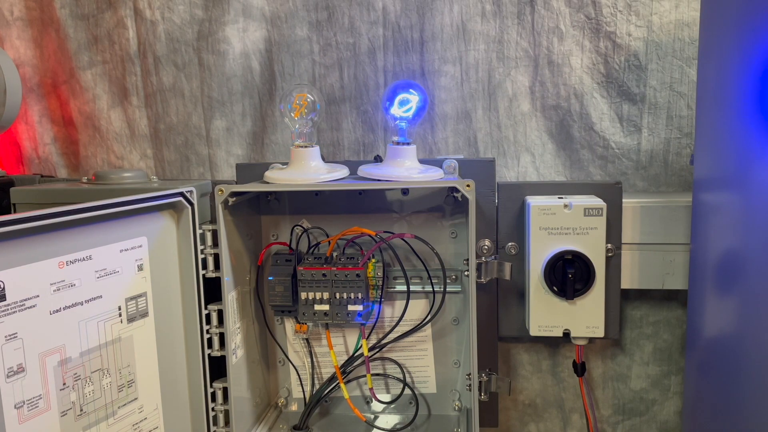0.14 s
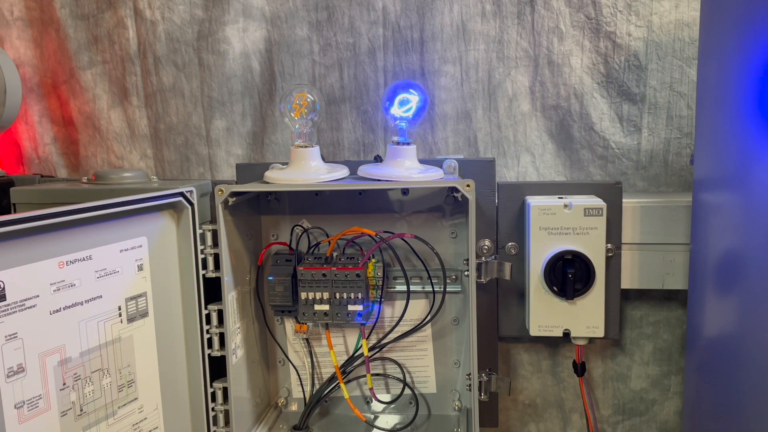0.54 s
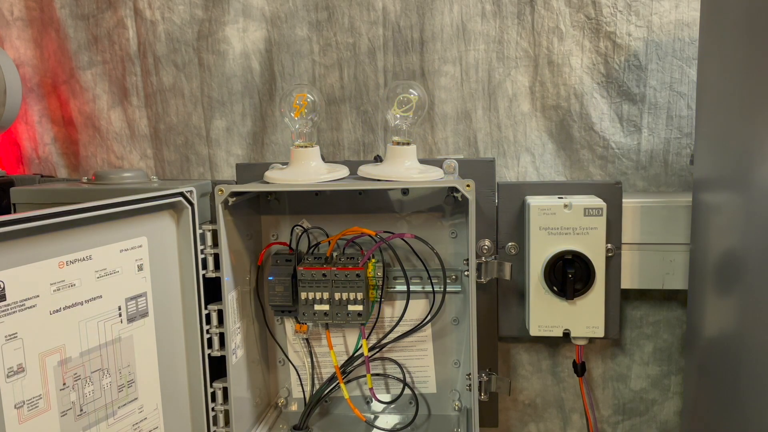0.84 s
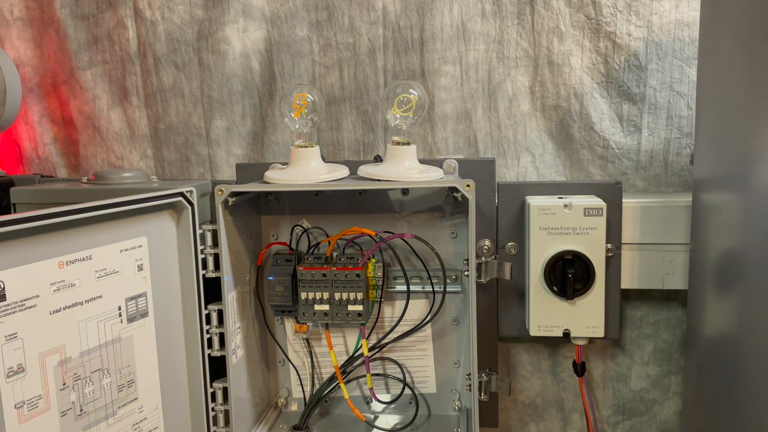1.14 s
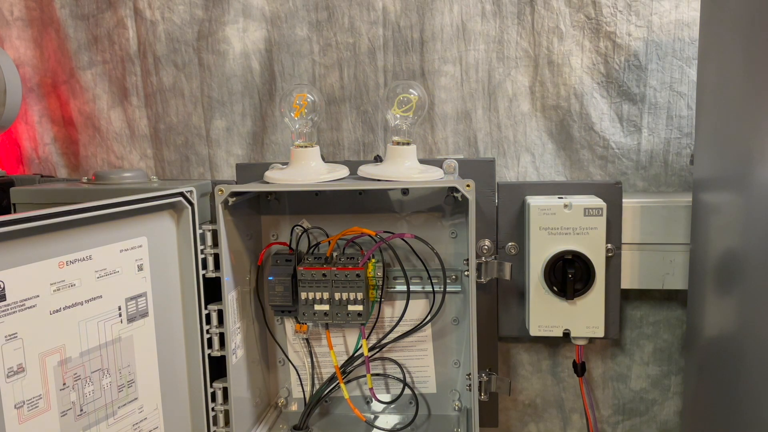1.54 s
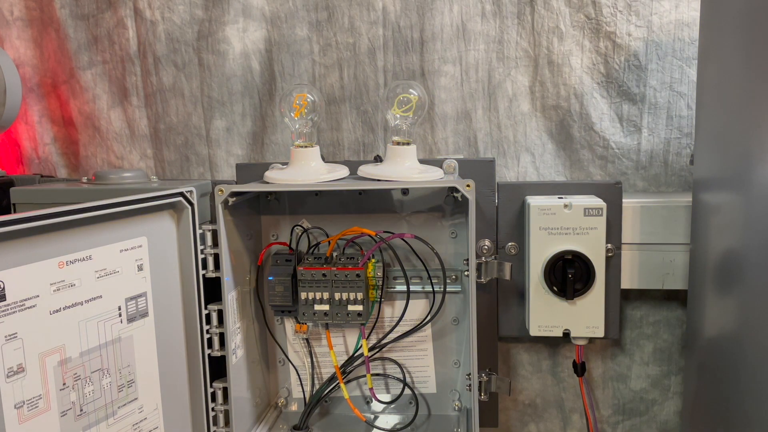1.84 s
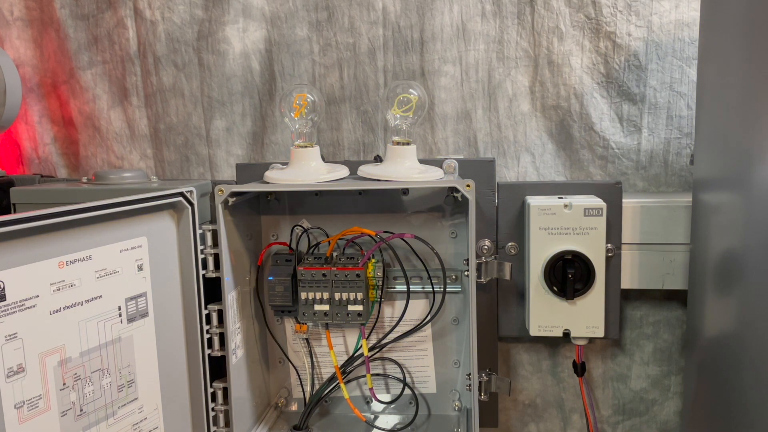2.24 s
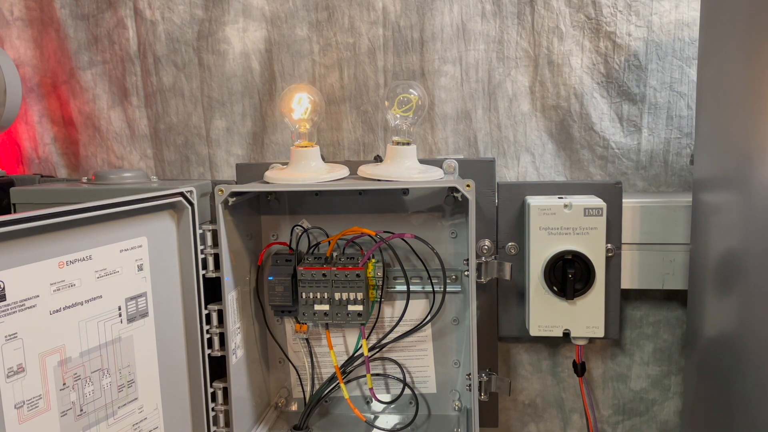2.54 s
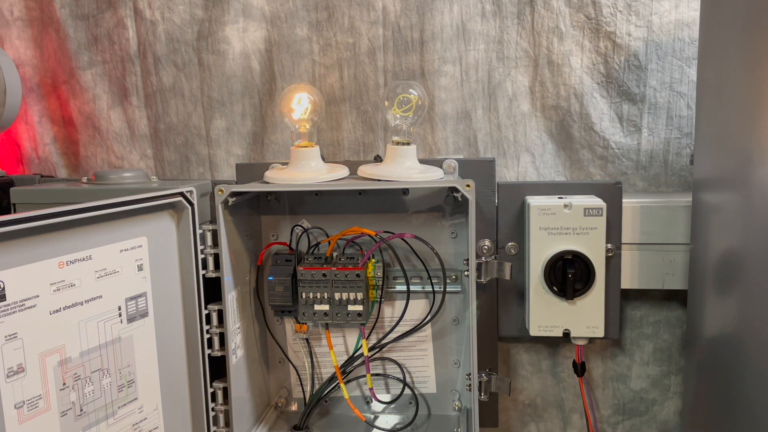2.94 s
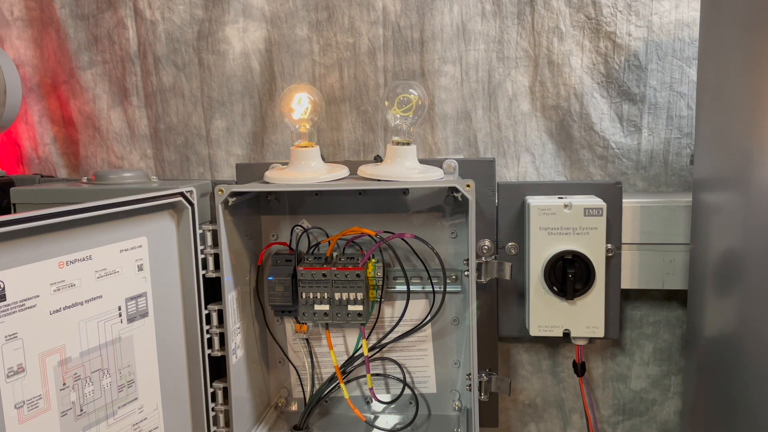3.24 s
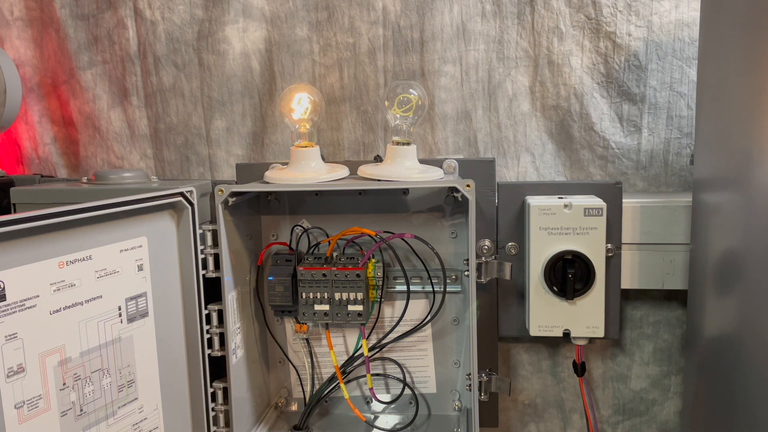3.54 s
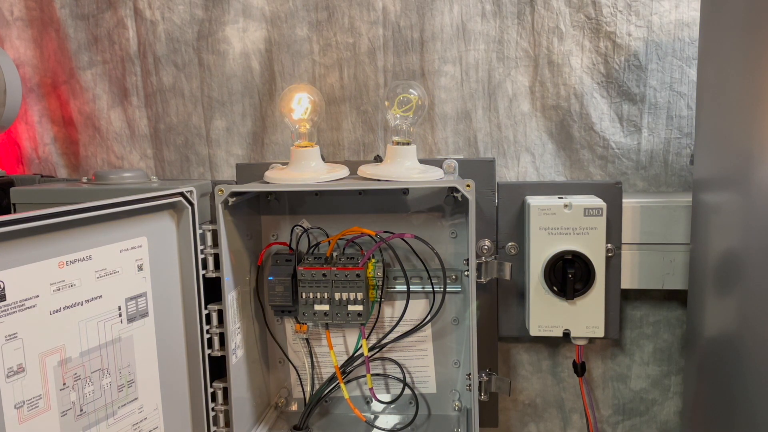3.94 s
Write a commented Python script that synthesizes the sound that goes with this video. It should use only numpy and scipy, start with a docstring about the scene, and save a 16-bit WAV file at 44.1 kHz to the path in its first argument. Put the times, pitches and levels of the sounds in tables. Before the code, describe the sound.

Indoors, a faint low mains hum and soft room rumble run throughout. Early on, a switching relay snaps open: several tiny blows fused into one hard clack with a boxy thump and short after-ring. Later come faint handling ticks and rustle, a muted knock, and a light touch running straight into another relay's brighter, metallic clack. Only the quiet background follows. Single nearby microphone, modest room reverberation.

```python
"""Mains hum, room rumble and hiss run throughout: a wavering sine and noise of set spectrum.
At 0.72 s one contactor in an open control box drops out: blows ring its housing, springs and the box.
From 1.76 s come faint ticks and rustle, as noise bursts; at 2.23 s one soft knock, as dying sines.
At 2.38 s a soft touch, one short note, leads a second contactor pulling in with a clack of its own.
Ticks, rustle, knock and touch get an echo of sparse taps; each clack leaves a dense after-ring."""
import sys
import numpy as np
from scipy import signal
from scipy.io import wavfile

SR = 44100
rng = np.random.default_rng(int(sys.argv[2]) if len(sys.argv) > 2 else 0)


def pcm_store(signal):
    """Save signal as 16-bit PCM."""
    levels = np.round(np.clip(np.atleast_2d(signal), -1, 1) * 32767)
    wavfile.write(sys.argv[1], SR, levels.astype(np.int16).T)


N = 180413


def gain_of(db):
    """Amplitude factor of a level in dB."""
    return 10 ** (np.asarray(db) / 20)


def evened(x):
    """Scale to rms 1."""
    return x / np.sqrt(np.mean(x ** 2) + 1e-20)


def read(points, hz):
    """Interpolate a table over log frequency."""
    f, value = np.transpose(points)
    return np.interp(np.log(hz + 1), np.log(f + 1), value)


def add(mix, start_s, sound):
    """Mix a sound in at its start time, cut at the end of the mix."""
    part = mix[round(start_s * SR):][:len(sound)]
    part += sound[:len(part)]


def rise(length, rise_s):
    """Exponential approach from 0 to 1."""
    return 1 - np.exp(-np.arange(length) / SR / rise_s)


def bandpass(x, order, low_hz, high_hz):
    """Butterworth band-pass."""
    return signal.sosfilt(signal.butter(order, [low_hz, high_hz], "band", fs=SR, output="sos"), x)


def ring(hz, db, t60_s):
    """Sum of exponentially dying sines, half a second long."""
    t = np.arange(SR // 2)[:, None] / SR
    envelope = gain_of(db - 60 * t / np.maximum(t60_s, .002))
    return (envelope * np.sin(2 * np.pi * hz * t)).sum(1)


def drift(top_hz):
    """Slow random wander of rms 1: 16 sines from 0.3 Hz up, weaker as they get faster."""
    t = np.arange(N) / SR
    rates_hz = np.geomspace(.3, top_hz, num=16)
    return evened(sum(np.sin(2 * np.pi * (f * t + rng.random())) / np.sqrt(f) for f in rates_hz))


# decay of the reflections: f/Hz, t60/s
ROOM_DECAY = [(100, 0.77), (260, 0.71), (700, 0.31), (1840, 0.34), (3500, 0.3), (5300, 0.29), (8500, 0.23),
              (11000, 0.24), (15500, .14)]
ECHO_DB, REFLECTION_RISE_S = -8, 0.00087


def reflections(colour, db):
    """Sparse reflections of random sign, each band dying at its own speed; db sets their energy."""
    taps = np.zeros(SR // 2)
    # one tap at a random place in every 10 samples
    at = np.arange(0, len(taps) - 10, 10) + rng.integers(0, 10, (len(taps) - 1) // 10)
    taps[at] = rng.choice([-1., 1.], len(at))
    hz, t, z = signal.stft(taps, SR, nperseg=512)
    band_db = read(colour, hz)[:, None] - 60 * t / read(ROOM_DECAY, hz)[:, None]
    tail = signal.istft(z * gain_of(band_db), SR, nperseg=512)[1]
    tail *= rise(len(tail), REFLECTION_RISE_S)  # reflections take a moment to build up
    return gain_of(db) * tail / np.linalg.norm(tail)


def with_echo(dry_sound, colour):
    """Add the room's answer to a sound."""
    return dry_sound + signal.fftconvolve(dry_sound, reflections(colour, ECHO_DB))[:N]


# relative spectrum of rumble and hiss: f/Hz, level/(dB per Hz)
AIR_SPECTRUM = [(20, -18.5), (55, -18.5), (78, -7.5), (98, -14.5), (130, -8.5), (224, -10), (270, -13.5),
                (471, -10), (540, -16), (692, -11), (772, -17), (1100, -17.5), (2810, -33.5), (14000, -38),
                (14500, -55.5)]
AIR_RMS_DB, SWELL_RMS_DB, SWELL_CORNER_HZ = -70.5, 1.2, 800


def air():
    """Rumble and hiss as shaped noise; the bass swells a little, the treble less."""
    frames, hz = N // 512 + 5, np.fft.rfftfreq(2048, 1 / SR)
    a, b = rng.standard_normal((frames, 1025, 2)).T
    swell = np.interp(np.arange(frames) * 512, np.arange(N), drift(3.5))
    swell_db = SWELL_RMS_DB * swell / (1 + hz[:, None] / SWELL_CORNER_HZ)
    spectrum = (a + 1j * b) * gain_of(read(AIR_SPECTRUM, hz)[:, None] + swell_db)
    noise = signal.istft(spectrum, nperseg=2048, noverlap=1536)[1][:N]
    return gain_of(AIR_RMS_DB) * evened(noise)


HUM_HZ, HUM_WANDER_RMS_HZ = 119.3, 0.8
HUM_RMS_DB, HUM_WAVER_RMS_DB = -74, 0.74


def hum():
    """Iron cores hum at twice the mains frequency; level and pitch waver."""
    turns = np.cumsum(HUM_HZ + HUM_WANDER_RMS_HZ * drift(9.9)) / SR
    level = gain_of(HUM_RMS_DB + HUM_WAVER_RMS_DB * drift(7.9))
    return np.sqrt(2) * level * np.sin(2 * np.pi * turns)


EDGE_DB, EDGE_TOP_HZ = -23.5, 2340  # edge relative to core


def scuff(db, hz, t60_s):
    """A short burst of grit: a core band around one frequency plus a faint bright edge."""
    t = np.arange(2048) / SR
    grit = rng.standard_normal(len(t)) * gain_of(-60 * t / max(t60_s, .002)) * rise(len(t), 0.00031)
    core = bandpass(grit, 2, hz / 1.5, hz * 1.1)
    edge = bandpass(grit, 3, hz, EDGE_TOP_HZ)
    return gain_of(db) * (core / np.linalg.norm(core) + gain_of(EDGE_DB) * edge / np.linalg.norm(edge))


# faint ticks: t/s, core energy level/dB, f/Hz, t60/s
TICK_EVENTS = [(1.766, -42.5, 1010, 0.033), (1.783, -37.5, 705, 0.024), (1.7975, -32, 757, .023),
               (1.802, -37, 1600, 0.022), (1.820, -42, 720, 0.016), (1.835, -44.5, 1920, 0.016),
               (1.89, -45, 1880, 0.044), (1.897, -41, 730, 0.019), (1.917, -39.5, 774, 0.012),
               (1.924, -54, 2200, .012), (2.053, -50, 1400, .008), (2.0846, -40.5, 1270, 0.005),
               (2.0879, -42, 1310, 0.0049)]


def ticks():
    """Faint ticks nearby, one burst of grit each."""
    out = np.zeros(N)
    for start_s, db, hz, t60_s in TICK_EVENTS:
        add(out, start_s, scuff(db, hz, t60_s))
    return out


RUSTLE_START_S, RUSTLE_END_S, RUSTLE_PER_S = 1.76, 2.3, 140  # mean rate
RUSTLE_MIN_DB, RUSTLE_SPAN_DB, RUSTLE_T60_S = -62, 10, .015
RUSTLE_LOW_HZ, RUSTLE_HIGH_HZ = 590, 1870


def rustle():
    """Fainter grit at random times, levels and pitches fills the spell of ticks."""
    out = np.zeros(N)
    gaps, sizes, pitches = rng.random((100, 3)).T
    starts_s = RUSTLE_START_S + np.cumsum(2 * gaps) / RUSTLE_PER_S
    for start_s, size, pitch in zip(starts_s, sizes, pitches):
        if start_s < RUSTLE_END_S:
            hz = RUSTLE_LOW_HZ * (RUSTLE_HIGH_HZ / RUSTLE_LOW_HZ) ** pitch
            add(out, start_s, scuff(RUSTLE_MIN_DB + RUSTLE_SPAN_DB * size, hz, RUSTLE_T60_S))
    return out


# knock modes: f/Hz, level before the slow rise/dB, t60/s
KNOCK_MODES = [(90, -51, .03), (268.7, -20, 0.011), (329, -58, .12), (1098, -43.5, 0.015),
               (1800, -52.5, 0.013), (3266, -56, 0.01094), (2720, -64.5, .05)]
KNOCK_S, KNOCK_RISE_S = 2.2256, 0.011
KNOCK_CLICK_DB, KNOCK_CLICK_T60_S = -51, .005


def knock():
    """Dying modes that build up slowly, with a small noise click on top."""
    out = np.zeros(N)
    body = ring(*np.transpose(KNOCK_MODES))[:8192]
    add(out, KNOCK_S, -body * rise(8192, KNOCK_RISE_S))  # a soft pad loads slowly
    click = rng.standard_normal(256) * gain_of(-60 * np.arange(256) / SR / KNOCK_CLICK_T60_S)
    add(out, KNOCK_S, gain_of(KNOCK_CLICK_DB) * click / np.linalg.norm(click))
    return out


TOUCH_S, TOUCH_LENGTH_S, TOUCH_HZ, TOUCH_PEAK_DB = 2.3825, .006, 2000, -31


def touch():
    """The first soft touch before the pull-in: one note that swells and dies."""
    out, t = np.zeros(N), np.arange(0, TOUCH_LENGTH_S, 1 / SR)
    swell = np.sin(np.pi * t / TOUCH_LENGTH_S) ** 0.59
    add(out, TOUCH_S, gain_of(TOUCH_PEAK_DB) * swell * np.sin(2 * np.pi * TOUCH_HZ * t))
    return out


SHOVE_RISE_S = 0.00098


def box_shove(shove, box_hz, box_db, box_t60_s):
    """The armature reaches its stop and shoves the box, whose panels ring."""
    out = np.zeros(N)
    start_s, db = shove
    panels = ring(box_hz, box_db, box_t60_s)
    panels *= rise(len(panels), SHOVE_RISE_S)  # a soft start keeps the thump from spreading into the bass
    add(out, start_s, gain_of(db) * panels)
    return out


CHATTER_T60_S, CHATTER_RISE_S, CHATTER_GAIN, STRIKE_GAIN = 0.014, 0.00063, 0.28, 0.79
HOUSING_LOW_HZ, HOUSING_TOP_HZ = 850, 13100  # too small to radiate below; gentle top limit


def contactor(blows, housing, springs, wash, wash_db):
    """Blow and chatter ring the housing, the blow alone rings the springs; an after-ring follows."""
    out, t = np.zeros(N), np.arange(2048) / SR
    hz, width_hz, db = np.transpose(housing)
    t60_s = np.log(1000) / np.pi / width_hz
    coils = ring(*np.transpose(springs))
    for start_s, blow_db, hardness in blows:
        blow = gain_of(blow_db)
        # loose parts rattle after the strike
        chatter = CHATTER_GAIN * rng.standard_normal(len(t)) * gain_of(-60 * t / CHATTER_T60_S)
        chatter *= rise(len(t), CHATTER_RISE_S)
        chatter[0] = STRIKE_GAIN
        # a hard blow drives the high modes more
        body = ring(hz, db + hardness * np.log2(hz / 2000), t60_s)[:2048]
        body = bandpass(body, 2, HOUSING_LOW_HZ, HOUSING_TOP_HZ)
        add(out, start_s, blow * signal.oaconvolve(body, chatter))
        add(out, start_s, blow * coils)
        # a fresh random tail for each blow, so that tails do not comb
        add(out, start_s, blow * np.linalg.norm(chatter) * reflections(wash, wash_db))
    return out


# armature and contact blows, drop-out before 1 s, then pull-in: t/s, level/dB, hardness/(dB per octave)
BLOW_EVENTS = [(.7217, -26, 1), (.7243, -27, 2.5), (.7289, -15.5, 0.5), (.7301, -18, -2), (.7328, -17, 0.4),
               (2.3830, -35, -1.5), (2.3941, -40.5, 7), (2.3964, -28.5, 7.5), (2.3976, -18, 0.5),
               (2.4012, -24.5, 2), (2.4070, -27.5, -0.5)]
# one shove per clack: t/s, level/dB
SHOVE_EVENTS = [(0.7353, -24.5), (2.4040, -36)]
# box panels, before the bass cut: f/Hz, drop-out level/dB, pull-in level/dB (re shove), t60/s
BOX_PANELS = [(65, -4.5, 6, 0.091), (125, -28.5, -3, .1), (194, -34.5, -25, 0.053), (302, -20, -4, 0.19),
              (338, -18, -7, 0.088), (363, -9.5, -6, .25), (438, 6, -28.5, 0.073), (540, 2.5, -17.5, 0.018),
              (468, -4.5, 2, 0.2), (615, -6, -9, .11), (682, -10, 2, 0.15), (837, -11.5, -23, 0.13),
              (1033, -11.5, -9.5, 0.047)]
# plastic housing modes, before hardness and band limits: f/Hz, width/Hz, level re blow/dB
DROP_HOUSING_MODES = [(1150.5, 90, -12.5), (1781, 2700, -13), (2170, 100, -3), (2900, 660, -2),
                      (4500, 172, -14.5), (5820, 450, -8.5), (6970, 450, -6), (7770, 330, -10),
                      (8700, 1100, -5.5), (9970, 320, -12), (11640, 2700, -17.5), (13690, 1200, -25)]
PULL_HOUSING_MODES = [(1090, 300, -19.5), (1783, 250, -8), (2250, 270, 1), (2570, 520, -1.5),
                      (3340, 235, -9), (5500, 500, -7), (6740, 200, -14.5), (7180, 270, -9.5),
                      (8540, 220, -13.5), (10040, 900, -27), (10980, 530, -17), (12700, 1500, -17.5)]
# springs that sing on, in close clusters: f/Hz, level re blow/dB, t60/s
DROP_SPRING_MODES = [(1932, -28, 0.28), (4530, -30.5, .2), (4500, -29.5, .2), (5804, -35.5, 0.18),
                     (7644, -38.5, 0.16)]
PULL_SPRING_MODES = [(2315, -21.5, 0.18), (3540, -37, 0.14), (5540, -40, 0.18), (5130, -39.5, 0.34),
                     (5360, -28, 0.28), (5420, -33, .25)]
# relative colour of the after-ring in box, wiring and room: f/Hz, level/(dB per Hz)
DROP_WASH_COLOUR = [(60, -13), (200, -32), (450, -14), (800, -17.5), (1300, -18.5), (1450, -21.5),
                    (1900, -20.5), (3000, -21.5), (4000, -30.5), (4620, -26.5), (5100, -37), (6000, -27.5),
                    (10000, -32), (15800, -38.5)]
PULL_WASH_COLOUR = [(60, -15), (255, -17), (680, -9.5), (830, -4.5), (1050, -4.5), (1350, -11), (2300, -7),
                    (3350, -13), (3800, -23), (5000, -22.5), (5340, -7.5), (5700, -22), (7200, -21.5),
                    (8000, -23.5), (8500, -19), (9300, -27.5), (15800, -29.5)]
DROP_WASH_DB, PULL_WASH_DB = 7.5, 12  # energy re blow and chatter, before the bass cut
BASS_CUT_HZ = 200


def clacks():
    """Drop-out, then pull-in; small parts radiate little bass, so both are high-passed."""
    box_hz, drop_db, pull_db, box_t60_s = np.transpose(BOX_PANELS)
    drop = [b for b in BLOW_EVENTS if b[0] < 1]
    pull = [b for b in BLOW_EVENTS if b[0] > 1]
    hits = box_shove(SHOVE_EVENTS[0], box_hz, drop_db, box_t60_s)
    hits += contactor(drop, DROP_HOUSING_MODES, DROP_SPRING_MODES, DROP_WASH_COLOUR, DROP_WASH_DB)
    hits += box_shove(SHOVE_EVENTS[1], box_hz, pull_db, box_t60_s)
    hits += contactor(pull, PULL_HOUSING_MODES, PULL_SPRING_MODES, PULL_WASH_COLOUR, PULL_WASH_DB)
    return signal.sosfilt(signal.butter(2, BASS_CUT_HZ, "high", fs=SR, output="sos"), hits)


def scene():
    """Sum of background, small sounds with echo, and clacks; one channel."""
    background = air() + hum()
    small = with_echo(ticks() + rustle() + knock(), [(100, 0), (10000, 0)])
    soft_touch = with_echo(touch(), [(100, 0.014), (10000, 0)])
    return (background + small + soft_touch + clacks())[None]


TOP_HZ = 15750


def record(dry):
    """Band limit: linear-phase low-pass."""
    lowpass = signal.firwin(255, TOP_HZ, window=("kaiser", 9), fs=SR)
    return signal.oaconvolve(dry, lowpass[None], "same")


dry = scene()
out = record(dry)
pcm_store(out)
```